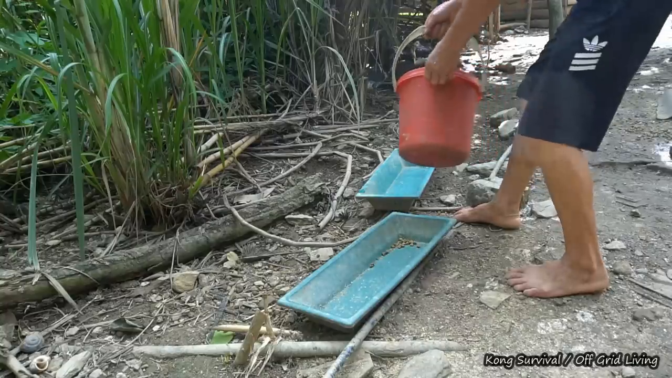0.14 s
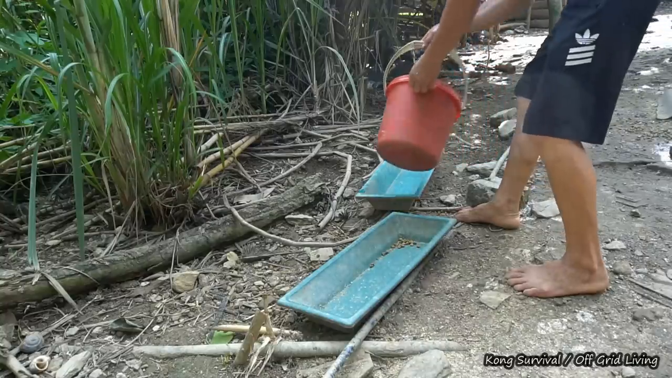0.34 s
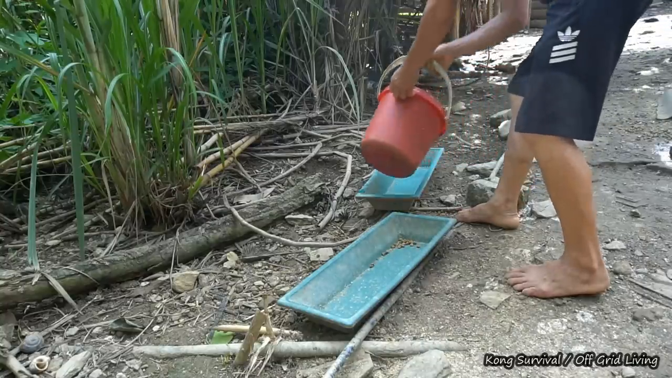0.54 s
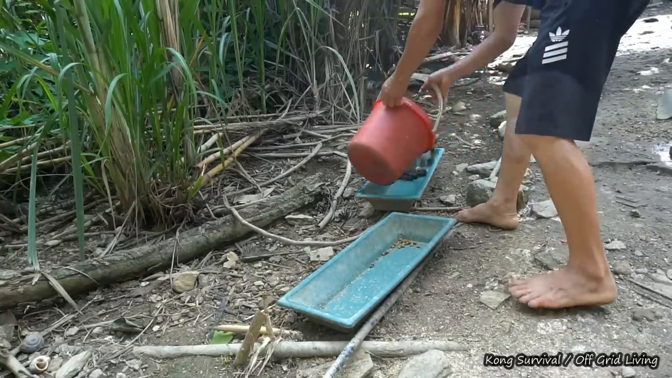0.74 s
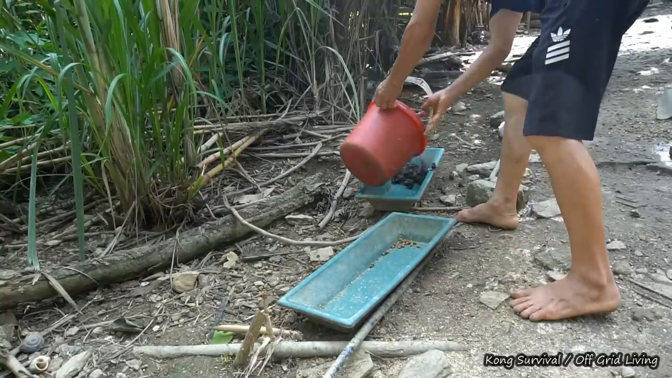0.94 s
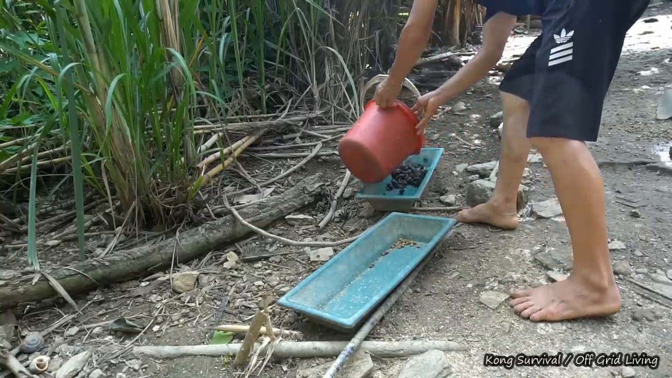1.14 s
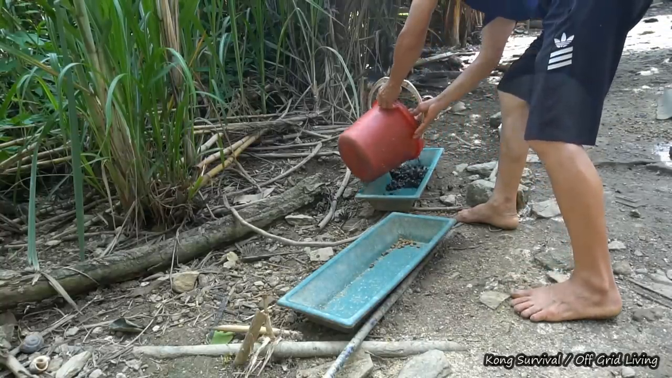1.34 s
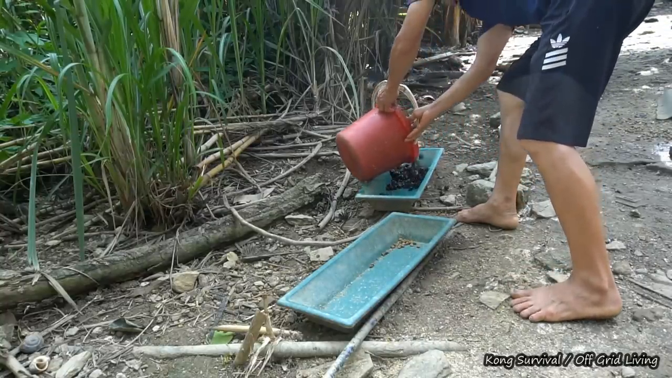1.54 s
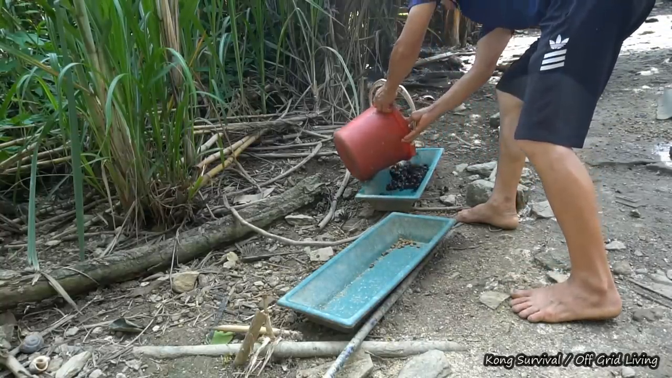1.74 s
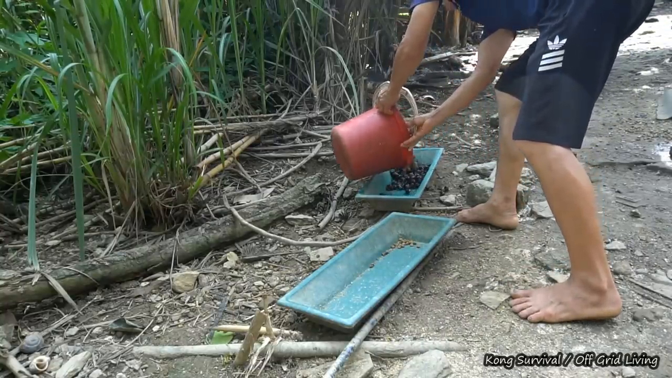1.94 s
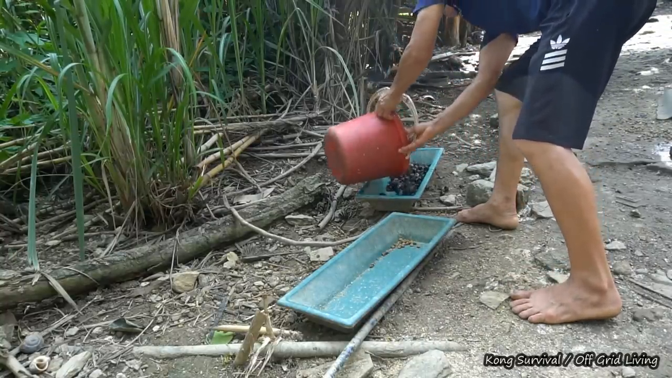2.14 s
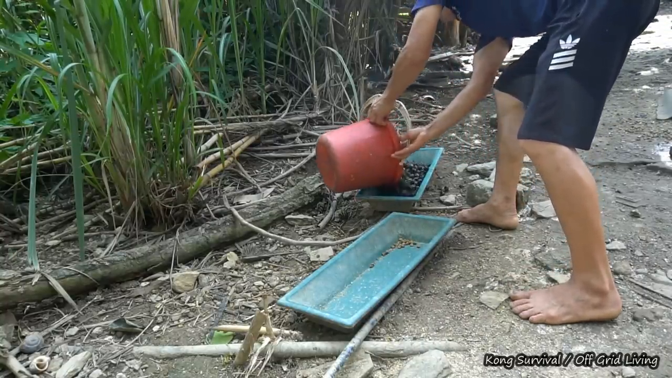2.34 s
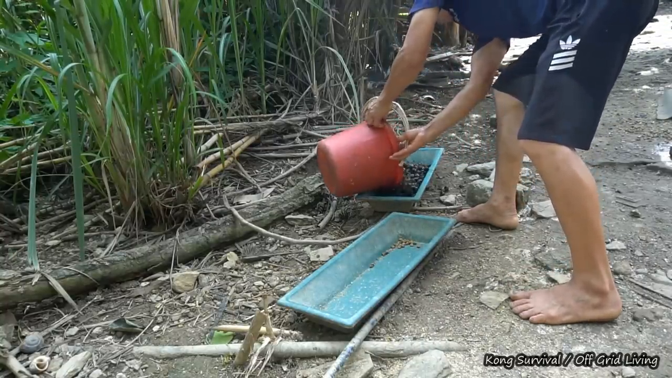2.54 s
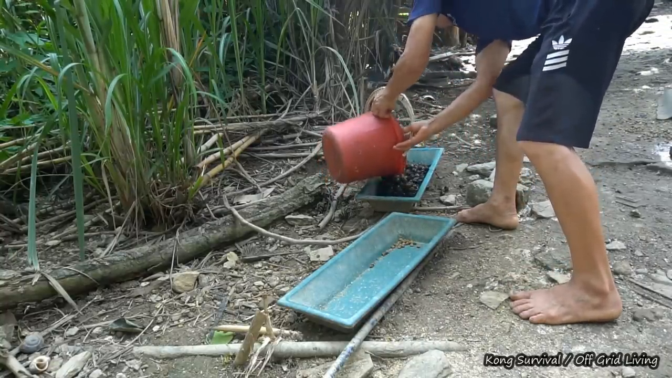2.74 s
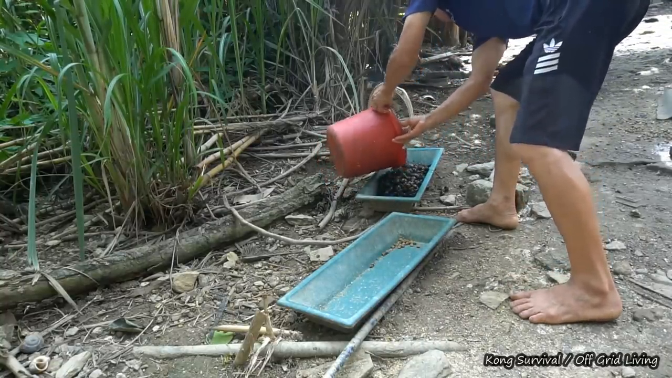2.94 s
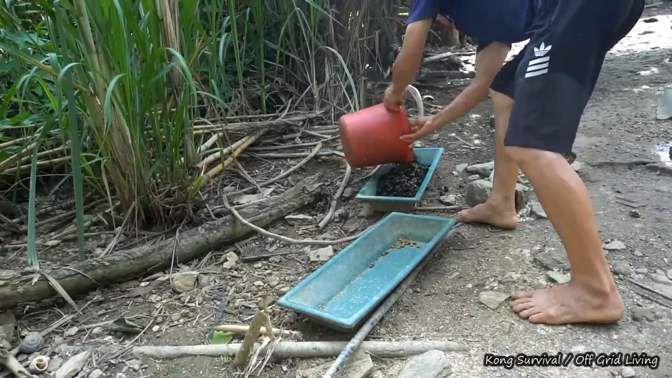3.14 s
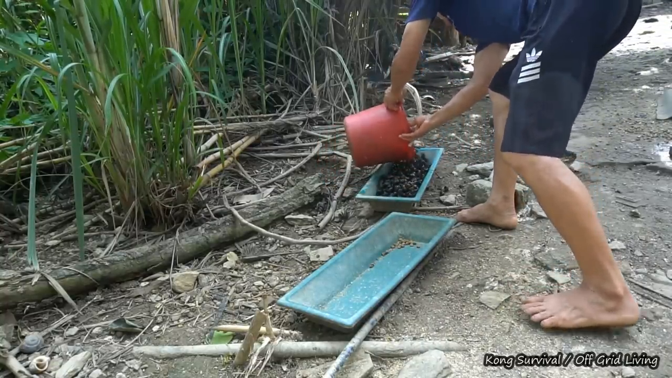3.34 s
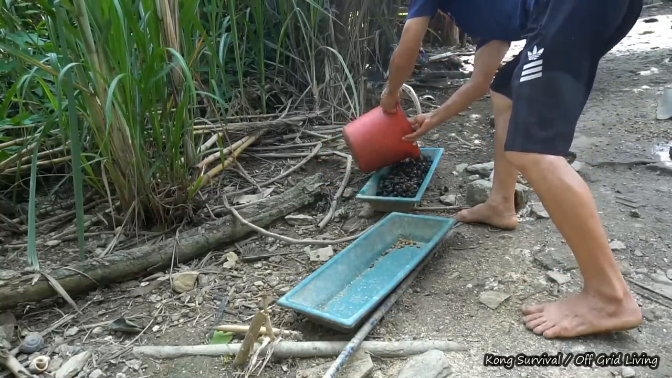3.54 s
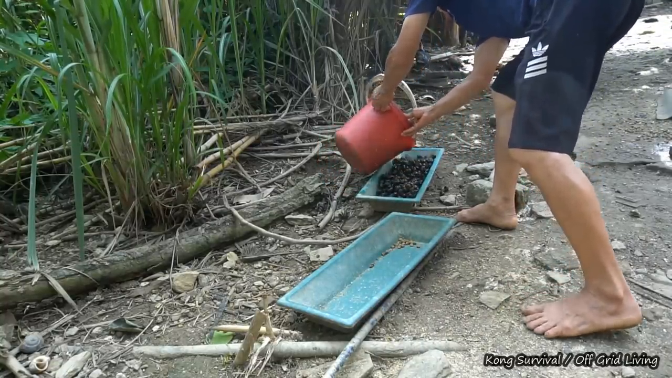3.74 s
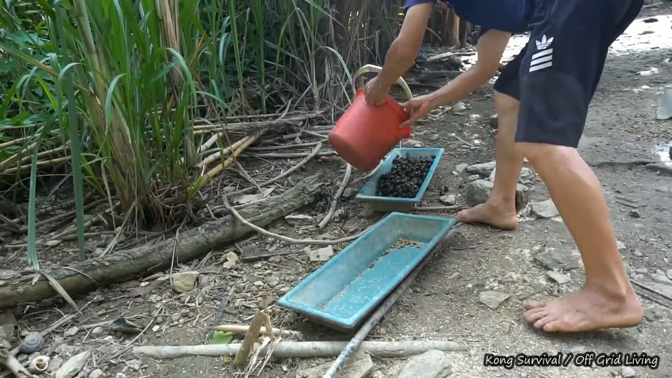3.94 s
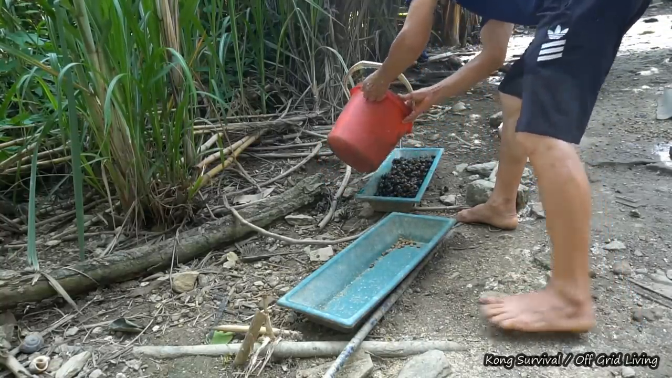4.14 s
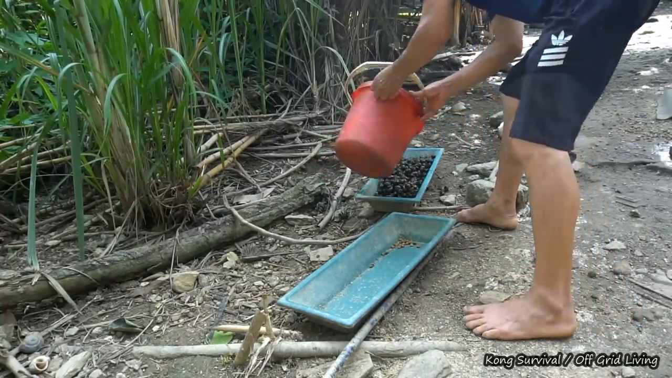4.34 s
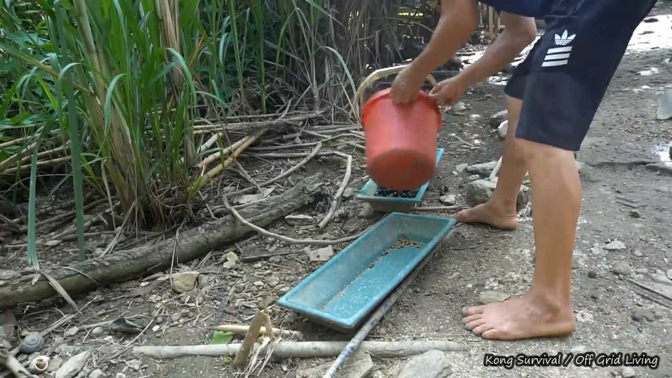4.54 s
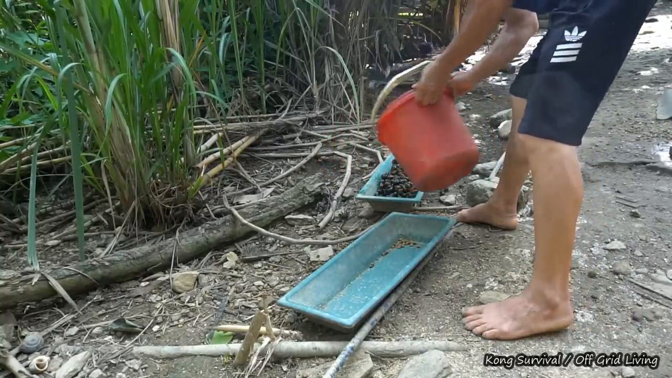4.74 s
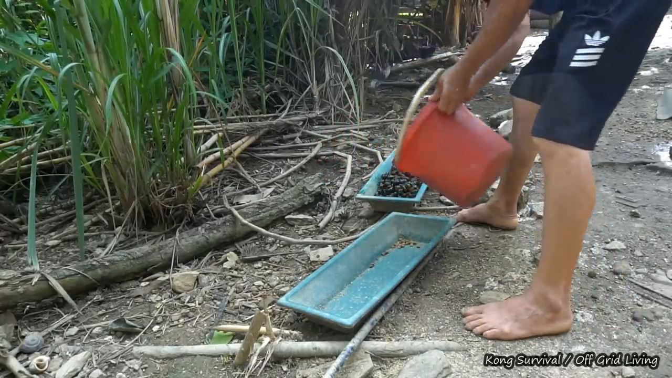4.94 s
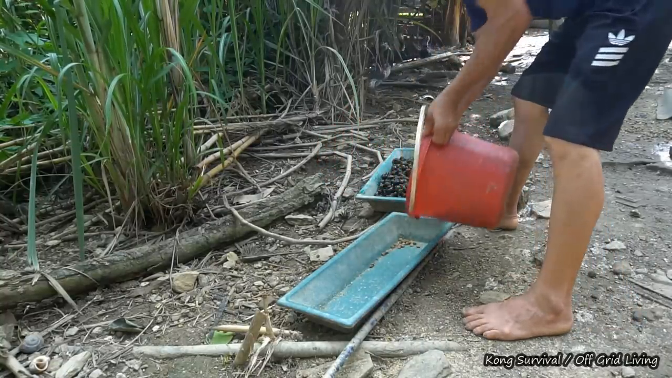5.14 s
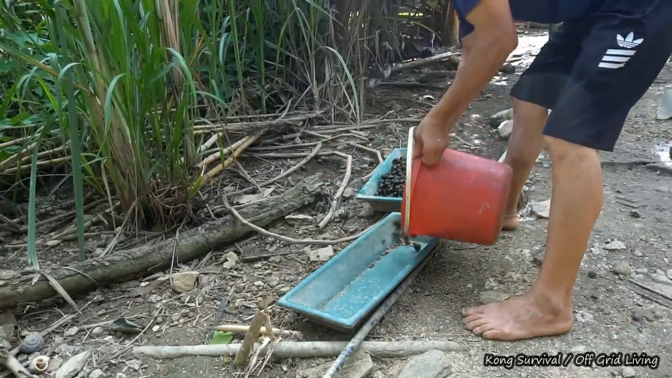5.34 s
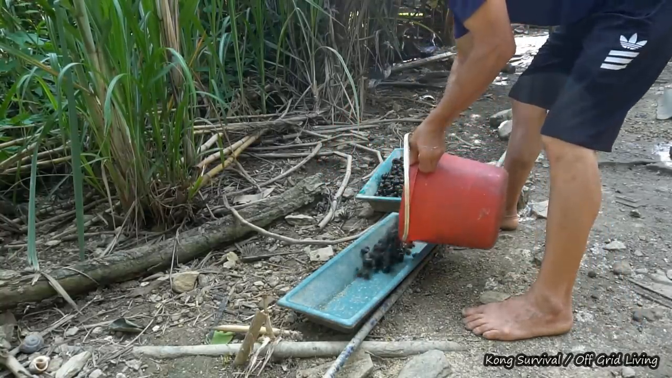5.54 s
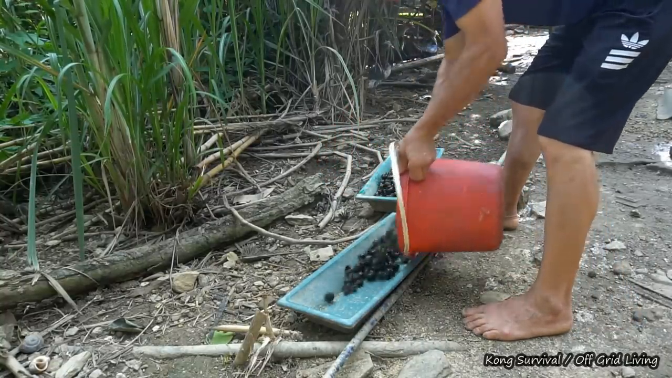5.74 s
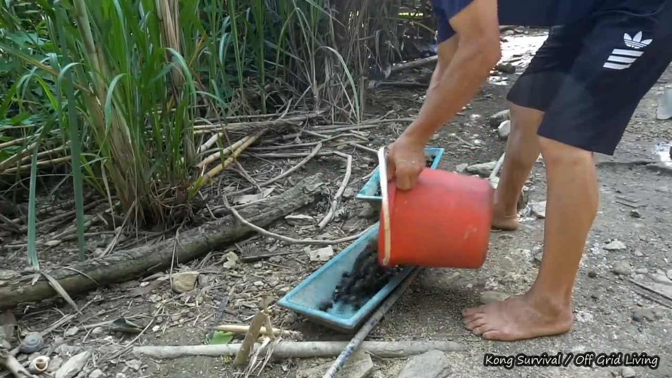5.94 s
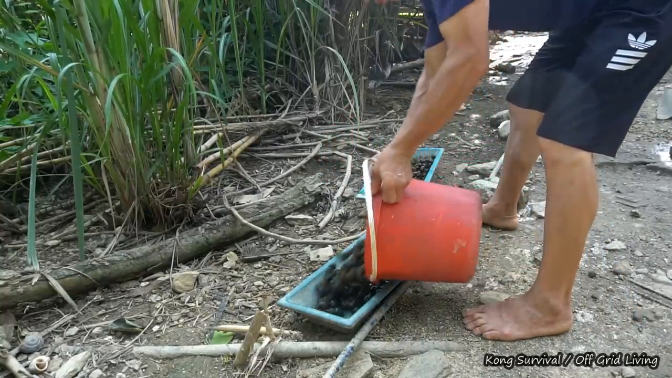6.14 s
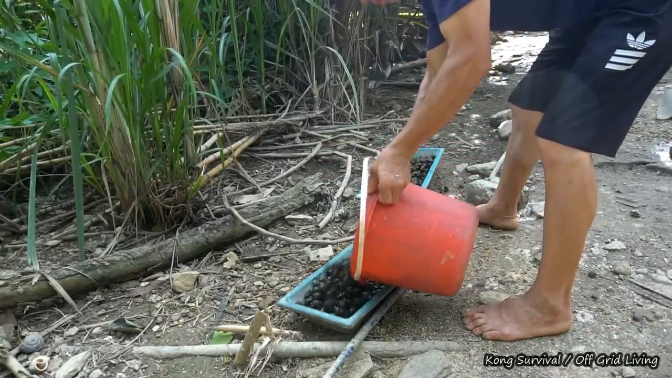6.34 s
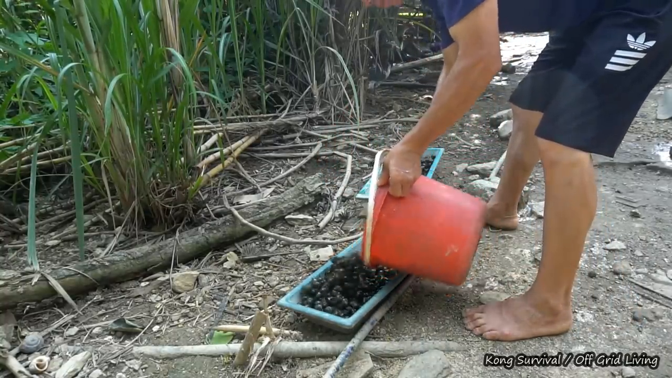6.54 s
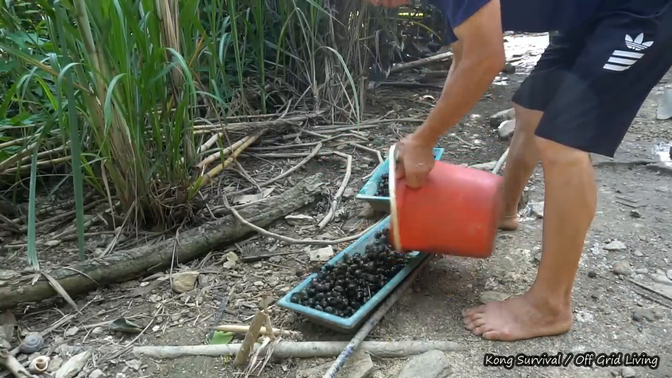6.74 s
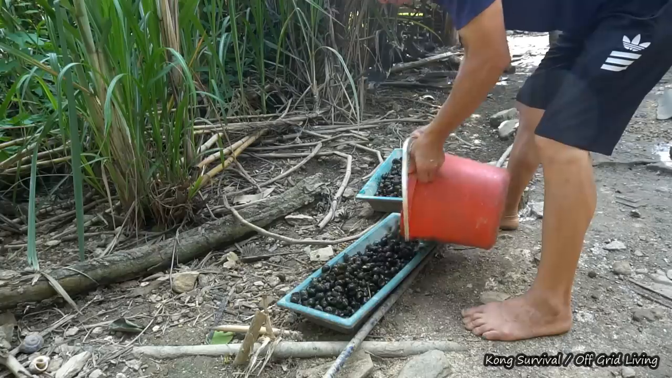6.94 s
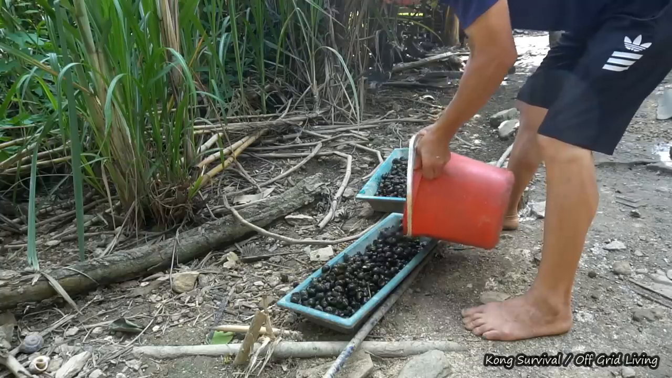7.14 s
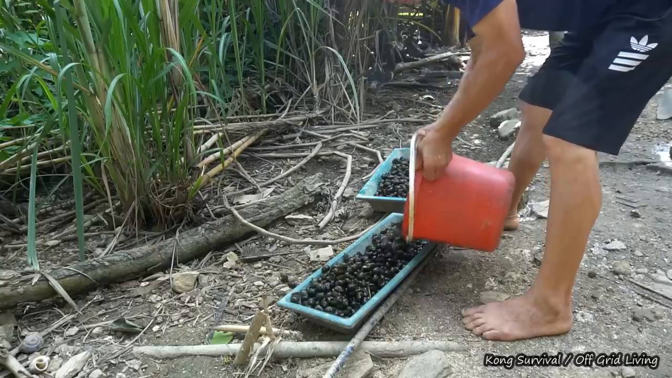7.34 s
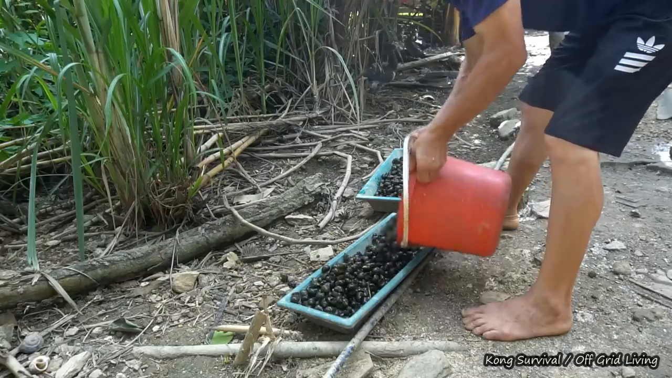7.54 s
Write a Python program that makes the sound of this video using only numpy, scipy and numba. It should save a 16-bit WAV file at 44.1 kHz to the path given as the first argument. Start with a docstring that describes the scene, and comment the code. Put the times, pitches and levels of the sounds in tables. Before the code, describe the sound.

A dense, dry clatter of small shells poured onto hollow plastic comes in two rushes with a quiet gap, over soft outdoor air.

```python
"""Snails tipped into trays

Snails are tipped from a plastic bucket into two plastic trays on stony ground, first a far one, then a near one.
Knocks on plastic and booms of the bucket are sums of dying tones; clicks of shell on shell add bursts of noise.
Many small random blows make the rattle, and the cane stalks throw back a short echo made of sparse taps.
Gliding tones make a far rooster and a small bird; ringing noise and a wavering tone make insects.
Shaped noise makes the soft outdoor wash, with light wind in its bass."""
import sys
import numpy as np
from scipy import signal
from scipy.fft import rfft, irfft
from scipy.io import wavfile
from scipy.ndimage import uniform_filter1d
from numba import njit

SR = 44100
rng = np.random.default_rng(int(sys.argv[2]) if len(sys.argv) > 2 else 0)


def generate_wav(sig):
    """Save sig (samples, or channels by samples) to the path in sys.argv[1] as 16-bit PCM at SR."""
    pcm = np.round(np.clip(np.atleast_2d(sig).T, -1, 1) * 32767).astype(np.int16)
    wavfile.write(sys.argv[1], SR, pcm)


def boost_factor(decibels):
    """Convert a level in decibels to a linear amplitude factor."""
    exponent = np.asarray(decibels, float) / 20
    return 10 ** exponent


N = 334719  # length in samples

# Bursts of rattle: long ones are shells sliding out, the shortest are clusters of bounces. Each row: start in
# seconds, length in seconds, knocking on plastic in dB, clicking of shell on shell in dB, change by the end in dB.
RATTLE_BURSTS = [(0.41, 0.11, -28, -36, -21), (0.594, 0.016, -21.5, -35, -1),
                 (0.672, 0.041, -22, -47, -4.5), (0.754, .13, -22, -25.5, 5), (0.909, 0.19, -17, -21, -3),
                 (1.149, 0.26, -20, -21, -15), (1.369, 0.048, -26.5, -26, 2.5),
                 (1.503, 0.045, -25, -24.5, -6), (1.572, 0.27, -22.5, -22.5, -6),
                 (1.918, 0.044, -21, -21.5, 1.5), (2.08, 0.0097, -20.5, -28.5, 9),
                 (2.175, 0.093, -16, -21.5, -5.5), (2.313, 0.33, -14, -19, -6.5),
                 (2.646, 0.21, -25.5, -25.5, -8), (2.92, 0.11, -24, -26.5, 1),
                 (3.087, 0.064, -30.5, -27, 3.5), (3.267, 0.11, -22.5, -23.5, 2.5),
                 (3.399, 0.075, -22.5, -29.5, -4), (3.501, 0.06, -21.5, -25, 5.5),
                 (3.583, 0.13, -24.5, -27, 1), (3.839, 0.022, -21, -32.5, -11.5),
                 (4.004, 0.0041, -27, -28.5, 4), (4.052, 0.054, -37, -32.5, -2.5),
                 (4.597, 0.0071, -29, -50, -4.5), (5.139, 0.0073, -49, -36, -2),
                 (5.239, 0.031, -22.5, -54, -17), (5.315, 0.0038, -16, -50, -9),
                 (5.363, 0.084, -20, -25, -3), (5.469, 0.012, -17, -22.5, -4), (5.513, 0.042, -20, -36, 5),
                 (5.517, 0.23, -17.5, -20, 0), (5.8, 0.066, -21.5, -26, 5),
                 (5.913, 0.058, -15.5, -19.5, 0.5), (6.036, 0.02, -21, -18.5, 0.5),
                 (6.099, 0.072, -18.5, -19.5, -0.5), (6.212, 0.1, -18, -19.5, 1.5),
                 (6.345, 0.067, -37, -21.5, -4), (6.47, 0.19, -21, -20.5, -4),
                 (6.651, 0.12, -38, -32, 10.5), (6.869, 0.11, -16.5, -22.5, -0.5),
                 (7.01, 0.14, -25, -27, 7), (7.21, 0.071, -43, -24, -5), (7.277, 0.038, -21, -43, 0),
                 (7.389, 0.01, -14, -14.5, -27), (7.465, 0.036, -21, -42, 4), (7.534, 0.0074, -40, -14, -7),
                 (7.585, .01, -21.5, -28, 6)]
ONSET_DB_PER_S, DYING_DB_PER_S = 510, 402  # how fast a burst arrives and settles
# Stragglers that roll on between the bursts. Each row: time in seconds, knocking in dB, clicking in dB.
STRAGGLERS = [(.416, -31.5, -39), (.6, -38, -33.5), (.8, -30, -39.5), (2, -40.5, -30.5), (2.9, -35, -36.5),
              (3.2, -34.5, -35.5), (3.5, -34, -30.5), (3.9, -36.5, -42), (4.18, -85, -73), (4.4, -61, -52),
              (4.55, -74, -73), (5.1, -72, -54.5), (5.25, -45.5, -45.5), (5.5, -23.5, -26.5),
              (7.1, -23, -26), (7.59, -34, -30)]
# Single loud knocks on plastic. Each row: time in seconds, level in dB, centre of the ring in Hz.
LOUD_KNOCKS = [(0.327, -21.5, 746), (0.371, -28.5, 800), (0.418, -13.5, 685), (0.447, -19, 1280),
               (0.533, -21, 720), (0.564, -4, 1670), (0.544, -16, 1800), (0.595, -0.5, 1910),
               (0.607, -7, 1240), (0.675, -12, 710), (0.688, -10, 680), (0.679, -2, 2680),
               (0.691, -2.5, 1720), (0.712, -4, 1670), (0.773, -3.5, 1110), (0.8, -6.5, 1090),
               (0.846, -13, 1140), (0.9, -6, 1020), (0.968, -4, 1750), (1.004, -4, 1120),
               (1.041, -6.5, 1150), (1.117, -1, 2300), (1.435, -4.5, 1740), (1.585, -2.5, 1950),
               (1.632, -3, 2150), (1.703, -5.5, 1970), (1.872, 1, 1250), (2.055, -3.5, 2010),
               (2.078, -11, 1310), (2.161, -6, 1130), (2.183, -3, 710), (2.302, -3, 1070),
               (2.677, -9.5, 1250), (2.974, 0, 2300), (3.054, -5, 2240), (3.347, -7, 3000),
               (3.586, -9, 1820), (3.666, -5, 2350), (3.737, -11, 830), (3.845, -9, 3000),
               (3.899, -15, 1810), (4, -4, 2480), (4.29, -38, 1300), (4.379, -30, 2580),
               (4.393, -16.5, 1600), (4.525, -30, 877), (4.569, -30, 1770), (4.585, -22, 570),
               (4.589, -13.5, 1200), (4.686, -26, 1110), (4.853, -24.5, 900), (4.8509, -21, 2380),
               (4.873, -28.5, 1900), (5.12, -31, 584), (5.233, -4, 2420), (5.251, -24, 732),
               (5.308, -6, 706), (5.369, -21, 724), (5.47, -6, 689), (5.507, -5.5, 1110), (5.653, -7, 2300),
               (5.73, -7, 719), (5.827, -12, 1580), (5.911, -13, 1340), (6.094, -10, 1100),
               (6.148, -7, 1460), (6.206, -13, 1340), (6.468, -10, 666), (6.658, -9.5, 674),
               (6.711, -5.5, 2380), (6.805, -9, 1110), (6.864, 2, 2430), (6.99, -6, 1210), (7.041, -8, 684),
               (7.085, -3, 1230), (7.14, -10, 720), (7.21, -11, 915), (7.322, -6.5, 1190),
               (7.507, -12, 2370), (7.515, -1.5, 1850)]
# Single loud clicks of shell on shell. Each row: time in seconds, level in dB, main ring in Hz.
LOUD_CLICKS = [(0.4168, -11, 2740), (0.709, -7.5, 3970), (0.721, -7, 5060), (0.751, -7, 3820),
               (0.816, -4, 4550), (0.868, -9, 4550), (0.887, -8, 3970), (0.966, -8, 4040),
               (0.985, -17, 5090), (1.0833, -4, 6130), (1.228, -10, 8900), (1.238, -11, 8300),
               (1.304, -4, 8060), (1.3625, -5.5, 7200), (1.399, -11, 5900), (1.483, -18, 9100),
               (1.495, -11, 7600), (1.5498, -8.5, 8100), (1.747, -7, 7800), (1.766, -3, 6450),
               (1.914, -7, 5000), (1.9523, -3, 5230), (1.962, -1, 4720), (2.0486, -6.5, 9200),
               (2.093, -14, 3480), (2.122, -5, 4050), (2.1567, 0, 4530), (2.251, -9.5, 5860),
               (2.3435, -11, 6440), (2.598, -4, 5050), (2.7263, -7, 6800), (2.761, -6.5, 4080),
               (2.9128, -11.5, 6740), (3.227, -5.5, 3040), (3.293, -11, 5230), (3.467, -6, 4620),
               (3.761, -13, 3200), (3.7733, -12, 4500), (3.787, -22, 6100), (3.7954, -17.5, 9650),
               (3.805, -14, 4800), (3.8175, -17, 8060), (3.885, -20, 4400), (3.9935, -8.5, 4800),
               (4.041, -13, 4330), (4.091, -15, 7300), (4.291, -30, 4770), (4.361, -29, 4100),
               (4.568, -19.5, 3460), (4.8523, -17.5, 3220), (5.1358, -16.5, 5300), (5.139, -24, 5040),
               (5.23, -15, 3420), (5.274, -12, 3670), (5.347, -10, 3500), (5.445, -4.5, 3620),
               (5.778, -7.5, 3930), (5.821, -5, 5440), (5.8684, -5, 4000), (5.913, -3.5, 7400),
               (6.0083, -2.5, 6350), (6.12, -1.5, 7340), (6.356, -4, 4300), (6.3607, -7, 4160),
               (6.368, -15, 4200), (6.4003, -5.5, 4340), (6.445, -6, 5070), (6.47, -3.5, 3960),
               (6.513, -3.5, 4960), (6.727, -2, 4070), (6.867, -11, 3500), (6.938, 0.5, 4770),
               (7.1598, -3, 3520), (7.243, -7, 4600), (7.3194, -1.5, 5030), (7.366, -6, 5200),
               (7.458, -9, 3530), (7.533, -24, 5020)]
# Booms of the bucket when its load is jolted. Each row: time in seconds, level in dB, pitch in Hz,
# time to die by 60 dB in seconds.
BUCKET_BOOMS = [(2.332, -21, 295, 0.43), (2.398, -25, 280, 0.37), (2.916, -23, 332, 0.027),
                (3.003, -19, 292, 0.08), (3.025, -13, 306, 0.071), (3.37, -13, 300, 0.054),
                (3.399, -9.5, 325, 0.038), (3.581, -18.5, 327, 0.03), (4.77, -39, 410, 0.052),
                (5.858, -11, 348, 0.044), (5.879, -13, 315, 0.043), (5.925, -16, 315, 0.052),
                (6.918, -9.5, 398, 0.047), (7.09, -15, 420, 0.018), (7.281, -11.5, 421, 0.095),
                (7.3, -10.5, 396, 0.039), (7.514, -11, 415, 0.042)]
# Tones at which each tray likes to ring. Each row: pitch in Hz, relative level in dB,
# time to die by 60 dB in seconds.
FAR_TRAY_TONES = [(185, -17, 0.061), (282, -14, 0.082), (407, -7, 0.025), (648, -5.5, 0.043),
                  (839, -2, 0.02), (1100, 8, 0.0073), (1275, 0, 0.022), (1760, 4.5, 0.014),
                  (2015, 4, 0.011), (2425, 7.5, 0.009), (3000, 8.5, 0.008), (3700, 10.5, 0.0064)]
NEAR_TRAY_TONES = [(147, -24.5, 0.12), (200, -7, 0.029), (304, -8.5, 0.056), (435, -8, 0.042),
                   (642, -2.5, 0.034), (718, 4, 0.019), (950, -9.5, 0.028), (1120, 5, 0.011),
                   (1330, 5, 0.016), (1730, 5, 0.013), (1900, 4, 0.0068), (2420, 10, 0.01),
                   (3026, 6, 0.009), (3570, 8, 0.008)]
MOVE_S = 4.2  # blows after this time land in the near tray
DETUNE = 0.055  # typical share by which each blow shifts the tones
FOCUS_DB = 4  # how strongly a loud knock gathers its ring around its centre
FAR_BRIGHT_DB, NEAR_BRIGHT_DB = 2, 1  # extra treble per octave in the rattle's clicks at each tray
FAR_RIGHT_DB, NEAR_RIGHT_DB = 1.5, 0.74  # each tray sits a little right: right gains this much, left loses it
LENGTH = 2048  # samples in one knock
# Colour of the noise in a blow of shell. Each row: frequency in Hz, relative level in dB per Hz.
SHELL_COLOUR = [(880, 0), (1500, -6), (2330, 5), (3410, -6.5), (4060, -0.5), (4710, 0), (5290, -1),
                (15500, -13.5)]
# How the echo dies. Each row: frequency in Hz, time to die by 60 dB in seconds.
ECHO_DECAY = [(300, 0.32), (1500, 0.1), (6000, 0.18), (14000, 0.18)]
ECHO_DB = -5
SHIFT_S = .12  # seconds between changes of echo path, so that no fixed colouring builds up
# Far rooster. Each row: time in seconds, pitch in Hz, level in dB, change of all overtones in dB.
ROOSTER_GLIDE = [(.02, 637, -55.5, 6), (.14, 676, -51, 3), (.178, 740, -39, -19), (.197, 723, -41, -4),
                 (.212, 818, -57, 6), (.24, 806, -48, 2), (.26, 780, -53, -6), (.29, 765, -40, -7),
                 (.36, 789, -56, 0), (.39, 743, -42, -3), (.5, 734, -51, -10), (.6, 684, -57, -10)]
# Overtones of the rooster. Each row: multiple of the pitch, level in dB before the change above.
ROOSTER_OVERTONES = [(2, -5.5), (3, -14), (5, -18)]
# Thin bird notes, one list for each note. Each row: time in seconds, pitch in Hz, level in dB.
BIRD_NOTES = [
    [(0, 12000, -72), (.035, 12800, -58), (.08, 11900, -74)],
    [(5.075, 8750, -58), (5.085, 8200, -39), (5.097, 7800, -65)],
]
# Insects. Each row: time in seconds, pulsing singer in dB, steady singer in dB, width of the steady one in Hz.
# Only two widths are used: the first for the early tone, the last for the late one.
INSECT_LEVELS = [(0, -47, -54.5, 25), (.45, -47.5, -51, 25), (.7, -57, -46, 25), (4.1, -63, -58, 300),
                 (4.4, -66, -54.5, 200), (5, -63, -60, 200), (7.6, -65, -52, 200)]
# Colour of the outdoor wash. Each row: frequency in Hz, relative level in dB per Hz.
WASH_COLOUR = [(15, -37), (28, -19), (50, -2.5), (80, -6.5), (127, -11.5), (326, -11), (373, -13),
               (427, -16), (575, -11.5), (775, -16), (2480, -19.5), (3080, -23), (4740, -20), (6210, -30),
               (7510, -24.5), (16000, -42)]
WASH_DB = -44.5
# Likeness of left and right in the wash. Each row: frequency in Hz, likeness from 0 to 1.
WASH_LIKENESS = [(60, 0.75), (240, 0.36), (950, 0.31), (3770, 0.13), (15000, 0.078)]
# Light wind on the microphones swells the rumble. Each row: time in seconds, relative level in dB.
WIND_SWELL = [(0, 4), (1, -1.5), (3.5, 0.5), (4.4, 6), (5.3, 2.5), (6.2, -4), (7.6, 2)]
WIND_TOP_HZ = 180  # the swell fades out above this


def pour():
    """The rattle: a stream of knocks on the tray in use and of clicks among the shells."""
    centre_hz = 1100 * 2 ** (0.54 * rng.standard_normal(240))
    knocks = np.vstack([knock(tray, nearest_tone(tray, centre_hz), focus_db=2.0)
                        for tray in (FAR_TRAY_TONES, NEAR_TRAY_TONES)])
    hz = np.geomspace(2800, 15500, 600)
    shell_db = 0.79 * read(SHELL_COLOUR, hz)
    clicks = np.vstack([click(hz) * boost_factor(shell_db + bright_db * np.log2(hz / 5000))[:, None]
                        for bright_db in (FAR_BRIGHT_DB, NEAR_BRIGHT_DB)])
    knocking = stream(1, knocks, count=240, per_s=420, spread_db=2.0, thinning=0.55)
    clicking = stream(2, clicks, count=600, per_s=900, spread_db=3.0, thinning=0.55)
    return knocking + clicking


def stream(column, bank, count, per_s, spread_db, thinning):
    """Random small blows, mostly soft, a few hard; a weak flow is also a sparse one."""
    s = np.arange(0, N - 64, 16) / SR  # at most one blow in every 16 samples
    happens, delay, hardness, choice = rng.random((4, len(s)))
    side_chance = rng.standard_normal((len(s), 2))
    s = s + delay * 16 / SR
    level_db = np.interp(s, s[::8], flow_db(column, s[::8]))
    level_db = level_db - 99 * (s < STRAGGLERS[0][0])  # nothing falls yet
    rate = per_s * boost_factor(thinning * np.clip(level_db + 21.5, -25, 0))
    size_db = spread_db * np.minimum(-np.log(hardness + 1e-9), 3)
    which = count * (s > MOVE_S) + (choice * count).astype(np.int64)  # the bank holds far sounds, then near
    mean_energy = np.mean(boost_factor(2 * size_db) * (bank ** 2).sum(1)[which])
    db = size_db + level_db - 10 * np.log10(mean_energy * rate / SR)
    on = happens < rate * 16 / SR
    return place(s[on], which[on], db[on], bank, side_chance[on])


def flow_db(column, t):
    """Strength of the stream: the bursts, each with quick onset, drift and settling, over the stragglers."""
    power = boost_factor(2 * curve(STRAGGLERS, column, t))
    for row in RATTLE_BURSTS:
        start, length, change_db = row[0], max(row[1], .002), row[-1]
        db = row[column + 1] + change_db * np.clip((t - start) / length, 0, 1)
        db -= ONSET_DB_PER_S * np.maximum(start - t, 0)
        db -= DYING_DB_PER_S * np.maximum(t - start - length, 0)
        power += boost_factor(2 * np.maximum(db, -120))
    return 10 * np.log10(power)


def single_knocks():
    """Loud knocks of shells on the tray in use, standing out of the rattle."""
    s, db, hz = np.transpose(LOUD_KNOCKS)
    near, far = knock(NEAR_TRAY_TONES, hz, FOCUS_DB), knock(FAR_TRAY_TONES, hz, FOCUS_DB)
    knocks = np.where(s[:, None] > MOVE_S, near, far)
    return place(s, np.arange(len(s)), db, knocks, rng.standard_normal((len(s), 2)))


def single_clicks():
    """Loud clicks of shell on shell, standing out of the rattle."""
    s, db, hz = np.transpose(LOUD_CLICKS)
    return place(s, np.arange(len(s)), db, click(hz), rng.standard_normal((len(s), 2)))


def bucket_booms():
    """A jolted load sets the bucket wall ringing at three neighbouring tones that swell softly and die."""
    s, db, hz, t60 = np.transpose(BUCKET_BOOMS)
    wall_hz = hz[:, None] * [1, 1.38, .82]
    booms = ring(wall_hz, np.array([0, -9, -14]), t60[:, None], np.ones(wall_hz.shape), 0.02, size=2 * LENGTH)
    return place(s, np.arange(len(s)), db, booms, np.zeros((len(s), 2)))


def knock(tones, centre_hz, focus_db):
    """A shell hits plastic and bounces twice: the place struck favours tones near the centre and detunes them."""
    hz, db, t60 = np.transpose(tones)
    level_chance, tune_chance, sign_chance = rng.standard_normal((3, len(centre_hz), len(tones)))
    tone_db = db - focus_db * np.log2(hz / centre_hz[:, None]) ** 2 + 3.3 * level_chance
    rows, nearest = np.arange(len(centre_hz)), abs(np.log(hz / centre_hz[:, None])).argmin(1)
    tune_chance[rows, nearest] = (centre_hz / hz[nearest] - 1) / DETUNE  # this one rings on the centre
    tone_db[rows, nearest] += focus_db
    body = ring(hz * (1 + DETUNE * tune_chance), tone_db, t60, sign_chance, 0.00075, size=LENGTH)
    body = body + boost_factor(-3.0) * crack(1.11 * centre_hz, 0.0071, 4.0, size=LENGTH)
    bounces = np.zeros((len(body), 512))
    bounces[:, 0] = 1  # the first hit
    bounce_at = rng.integers(25, 160, (len(body), 2))  # in samples
    np.put_along_axis(bounces, bounce_at, boost_factor([-12, -15]) * [1, -1], 1)
    return signal.fftconvolve(body, bounces, axes=1)[:, :LENGTH]


def nearest_tone(tones, hz):
    """The tone of the tray that lies closest to each hz."""
    tones_hz = np.array(tones)[:, 0]
    return tones_hz[abs(np.log(tones_hz / hz[:, None])).argmin(1)]


def click(hz):
    """A shell rings briefly at one main tone and two weaker ones, with a crack; small ones die faster, crack more."""
    tune_chance, sign_chance = rng.standard_normal((2, len(hz), 3))
    tones_hz = hz[:, None] * [1, 1.3, .8] * (1 + [0, .08, .08] * tune_chance)
    tones_hz = np.minimum(tones_hz, SR / 2.5)
    t60 = 0.013 * np.sqrt(4000 / tones_hz)
    body = ring(tones_hz, np.array([0, -6, -7]), t60, sign_chance, 0.0001, size=LENGTH // 2)
    crack_db = 4.5 * np.log2(hz / 9000)
    return body + boost_factor(crack_db)[:, None] * crack(hz, 0.015, 6, size=LENGTH // 2)


def ring(hz, db, t60, sign_chance, rise, size):
    """Dying tones, one sound a row, struck softly over the rise time in seconds; peak 1."""
    t = np.arange(size) / SR
    phase = 2 * np.pi * hz[..., None] * t + np.pi * (sign_chance[..., None] > 0)
    fade_db = db[..., None] - 60 * t / np.maximum(t60, .003)[..., None]
    sound = (boost_factor(fade_db) * np.sin(phase)).sum(1)
    sound *= 1 - np.exp(-t / rise)
    return sound / abs(sound).max(1, keepdims=True)


def crack(centre_hz, t60, width_db, size):
    """Short bursts of noise in the colour of shell, favouring the range around their centre; peak 1."""
    hz, t = np.fft.rfftfreq(size, 1 / SR), np.arange(size) / SR
    burst = rng.standard_normal((len(centre_hz), size))
    octaves_squared = np.log2((hz + 50) / centre_hz[:, None]) ** 2
    colour_db = read(SHELL_COLOUR, hz) - width_db * np.minimum(octaves_squared, 4)
    burst = irfft(rfft(burst) * boost_factor(colour_db), size)
    burst = burst * boost_factor(-60 * t / t60) * (1 - np.exp(-t / 0.00021))
    return burst / abs(burst).max(1, keepdims=True)


def place(s, which, db, bank, chance):
    """Each blow lands a little left or right: a level and time difference at the two microphones."""
    mix = np.zeros((2, N))
    right_db = np.where(s > MOVE_S, NEAR_RIGHT_DB, FAR_RIGHT_DB)[:, None] + 0.36 * chance[:, :1]
    lag = np.clip(np.round(0.6 * chance[:, 1]), -3, 3).astype(np.int64)  # in samples
    gains = boost_factor(db[:, None] + right_db * np.array([-1, 1]))
    add(mix, np.round(s * SR).astype(np.int64), which, gains, lag, np.ascontiguousarray(bank))
    return mix


@njit
def add(mix, at, which, gains, lag, bank):
    """Adds the chosen sound at each place, with its own left and right gain and a lag on the right."""
    for k in range(len(at)):
        for side in range(2):
            start = at[k] + 4 + (lag[k] if side else 0)
            count = min(bank.shape[1], mix.shape[1] - start)
            mix[side, start:start + count] += gains[k, side] * bank[which[k], :count]


def echo(x):
    """Sparse taps of random sign off ground and stalks, each band dying at its own speed; eight paths take turns."""
    taps = np.zeros((8, 2, 12000))
    at = np.arange(100, 11980, 20) + rng.integers(0, 20, (8, 2, 594))
    np.put_along_axis(taps, at, rng.choice([-1., 1.], at.shape), 2)
    hz, t, z = signal.stft(taps, SR, nperseg=128)
    dying = boost_factor(-60 * t / read(ECHO_DECAY, hz)[:, None])
    tails = signal.istft(z * dying, SR, nperseg=128)[1]
    tails = tails + 0.12 * tails[:, ::-1]  # both microphones share part of each path
    thinned = signal.lfilter(*signal.butter(1, 1500, "high", fs=SR), x.mean(0))
    turn = (np.arange(N) / SR / SHIFT_S - np.arange(8)[:, None]) % 8
    windows = np.sin(np.pi / 2 * np.minimum(turn, 2))  # each path fades in, then out under the next
    return sum(signal.oaconvolve((window * thinned)[None], tail / np.linalg.norm(tail[0]), axes=1)[:, :N]
               for window, tail in zip(windows, tails))


def rooster():
    """The far rooster's voice: a gliding tone with overtones."""
    return whistle(ROOSTER_GLIDE, ROOSTER_OVERTONES)


def small_bird():
    """Thin, high gliding notes without overtones."""
    return sum(whistle(rows, []) for rows in BIRD_NOTES)


def whistle(rows, overtones):
    """A gliding tone with its overtones, slightly unsteady in pitch and level."""
    t = np.arange(N) / SR
    pitch_wobble, level_wobble, tone_wobble = [evened(uniform_filter1d(noise, 400))
                                               for noise in rng.standard_normal((3, N))]
    turns = np.cumsum(curve(rows, 1, t) * (1 + 0.011 * pitch_wobble.clip(-3, 3))) / SR
    change_db = curve(rows, -1, t) + 1.0 + 2.8 * tone_wobble
    voice = np.sin(2 * np.pi * turns)
    for multiple, db in overtones:
        voice = voice + boost_factor(db + change_db) * np.sin(2 * np.pi * multiple * turns)
    gate = uniform_filter1d(1. * (t >= rows[0][0]) * (t < rows[-1][0]), 300)
    return np.sqrt(2) * gate * boost_factor(curve(rows, 2, t) + 2.2 * level_wobble) * voice


def pulsing_insect():
    """One singer scrapes 200 strokes a second into a ringing wing, every eighth accented."""
    t = np.arange(N) / SR
    accent = np.exp(2.5 * (np.cos(2 * np.pi * 25 * (t - .02)) - 1))
    strokes = (0.91 + .5 * accent) * np.exp(0.25 * np.cos(2 * np.pi * 200 * t))
    wing = rng.standard_normal(N)
    for _ in range(3):
        wing = resonate(wing, 7480, 420)
    overtone = evened(resonate(rng.standard_normal(N), 14700, 250))
    song = evened(strokes * wing) + boost_factor(-12) * accent * overtone
    return boost_factor(curve(INSECT_LEVELS, 1, t)) * song * boost_factor([[-1.5], [1.5]])  # a little to the right


def steady_insect():
    """Another singer holds a fuzzy tone: a wavering narrow one at first, wide bands of noise from 2 s on."""
    t, noise = np.arange(N) / SR, rng.standard_normal((3, N))
    waver_hz = INSECT_LEVELS[0][3] * evened(uniform_filter1d(noise[0], 300))
    tone = np.sqrt(2) * np.sin(2 * np.pi * np.cumsum(4760 + waver_hz) / SR)
    narrow = tone + 0.5 * evened(resonate(noise[1], 4760, 120))
    main = evened(resonate(resonate(noise[2], 4900, INSECT_LEVELS[-1][3]), 4900, 350))
    lower = evened(resonate(resonate(noise[1], 4400, 250), 4400, 250))
    wide = main + .35 * lower
    return boost_factor(curve(INSECT_LEVELS, 2, t)) * np.where(t < 2, narrow, wide)


def wash():
    """Distant leaves and air: random short-time spectra with drifting patches, and wind swelling the bass."""
    frames, hz = N // 256 + 5, np.fft.rfftfreq(1024, 1 / SR)
    a, b, c, d, patches = rng.standard_normal((frames, 513, 5)).T
    patches = evened(uniform_filter1d(uniform_filter1d(patches, 12, 0), 14, 1))
    flutter = evened(uniform_filter1d(rng.standard_normal(frames), 8))
    gusts_db = curve(WIND_SWELL, 1, np.arange(frames) * 256 / SR) + 1.5 * flutter
    same = np.clip(read(WASH_LIKENESS, hz), -1, 1)[:, None]
    left = a + 1j * b
    right = same * left + np.sqrt(1 - same ** 2) * (c + 1j * d)
    rumble_db = gusts_db / (1 + (hz[:, None] / WIND_TOP_HZ) ** 4)
    z = np.array([left, right]) * boost_factor(read(WASH_COLOUR, hz)[:, None] + 2.0 * patches + rumble_db)
    return boost_factor(WASH_DB) * evened(signal.istft(z, nperseg=1024, noverlap=768)[1][:, :N])


def evened(x):
    """Scales to an rms (average strength) of 1."""
    return x / np.sqrt(np.mean(x ** 2) + 1e-20)


def read(points, hz):
    """Value of a spectrum table at hz."""
    f, value = np.transpose(points)
    return np.interp(np.log(hz + 1), np.log(f + 1), value)


def curve(rows, column, t):
    """One column of a time table at times t."""
    rows = np.array(rows)
    return np.interp(t, rows[:, 0], rows[:, column])


def resonate(x, hz, width):
    """Rings at hz: shifts hz down to zero, smooths, and shifts back; width in Hz."""
    turn = np.exp(2j * np.pi * np.cumsum(hz * np.ones(len(x))) / SR)
    r = np.exp(-np.pi * width / SR)
    return 2 * (turn * signal.lfilter([1 - r], [1, -r], x / turn)).real


def scene():
    """All sources at the two microphones; small objects radiate no deep bass."""
    blows = pour() + single_knocks() + single_clicks() + bucket_booms()
    shells = signal.sosfilt(signal.butter(6, 115, "high", fs=SR, output="sos"), blows)
    birds = rooster() + small_bird()
    return shells + boost_factor(ECHO_DB) * echo(shells) + birds + pulsing_insect() + steady_insect() + wash()


def low_pass(x):
    """Removes everything above the highest recorded frequency."""
    return signal.sosfilt(signal.butter(12, 16950, fs=SR, output="sos"), x)


def record(dry):
    """Close microphones hear the bass alike; peaks are softly squeezed; then the top treble is cut."""
    mid, side = (dry[0] + dry[1]) / 2, (dry[0] - dry[1]) / 2
    side = signal.lfilter(*signal.butter(1, 450, "high", fs=SR), side)
    mid = signal.lfilter(*signal.butter(3, 38, "high", fs=SR), mid)  # the deepest rumble is cut
    squeezed = 0.76 * np.tanh(np.array([mid + side, mid - side]) / 1.132)
    treble_cut = signal.firwin(255, 16000, window=("kaiser", 8), fs=SR)
    finished = signal.oaconvolve(squeezed, treble_cut[None], "same")
    return low_pass(finished)


dry = scene()
out = record(dry)
generate_wav(out)
```